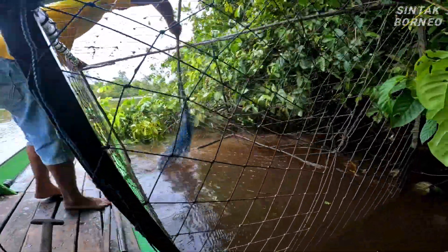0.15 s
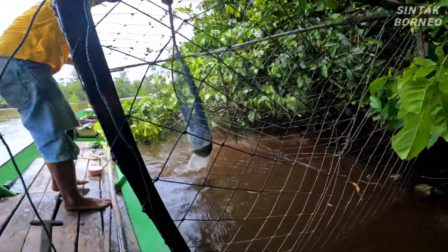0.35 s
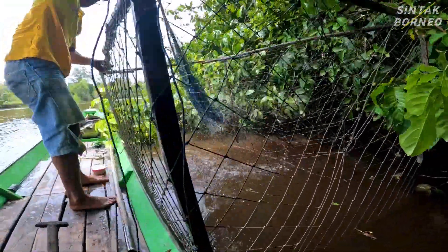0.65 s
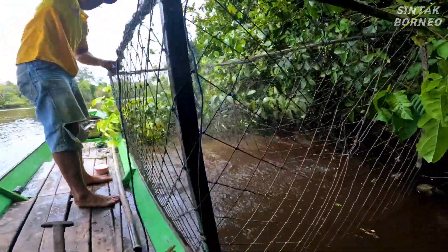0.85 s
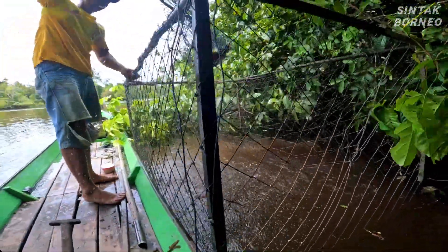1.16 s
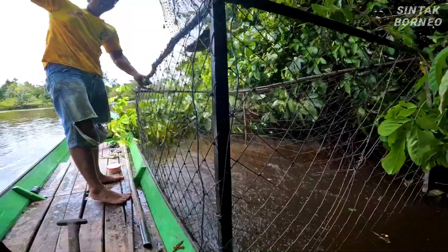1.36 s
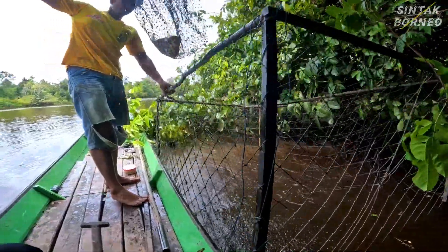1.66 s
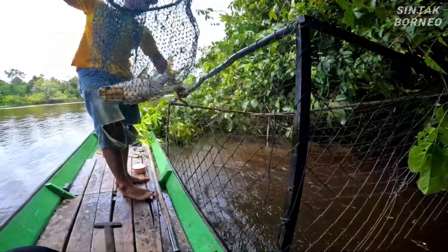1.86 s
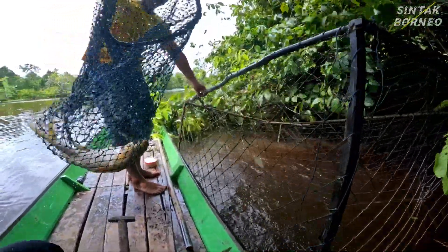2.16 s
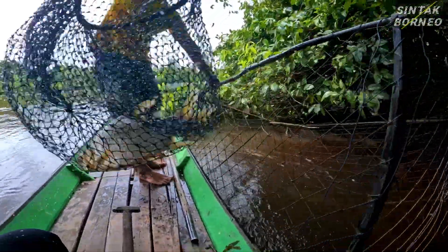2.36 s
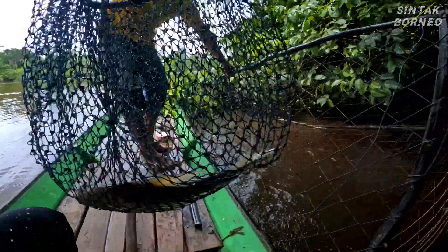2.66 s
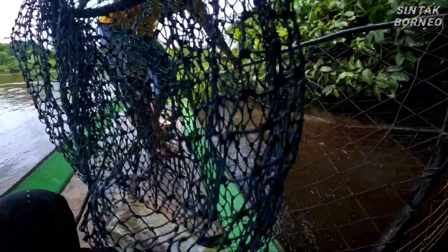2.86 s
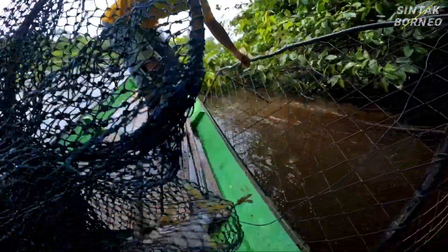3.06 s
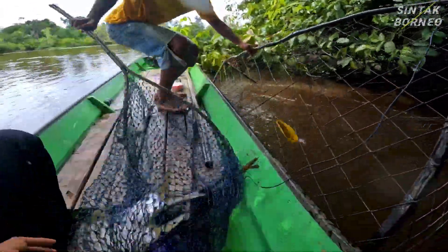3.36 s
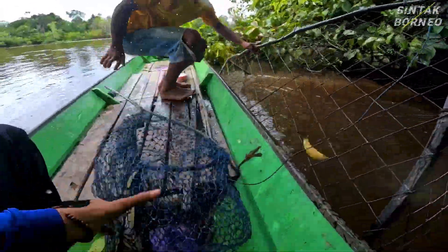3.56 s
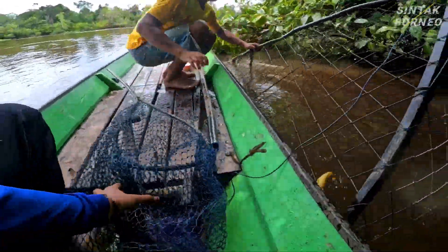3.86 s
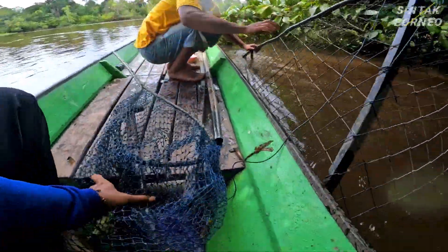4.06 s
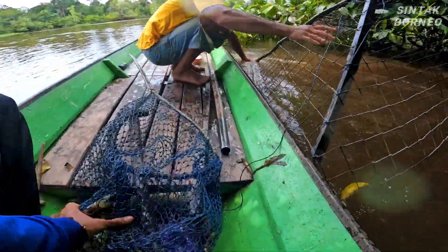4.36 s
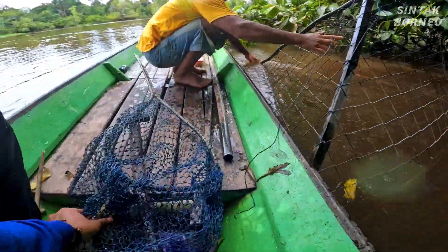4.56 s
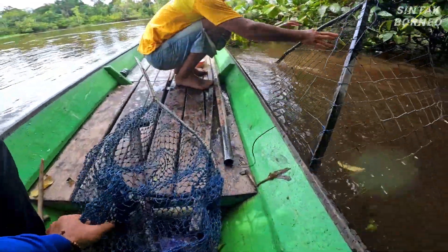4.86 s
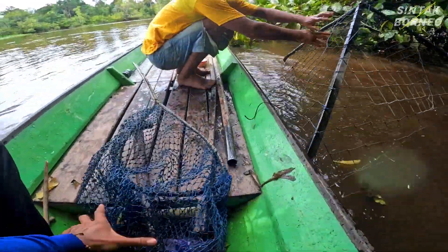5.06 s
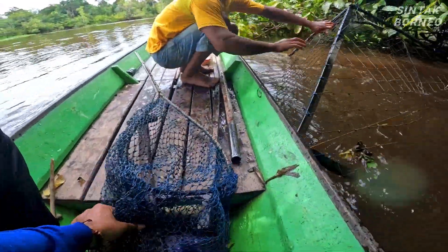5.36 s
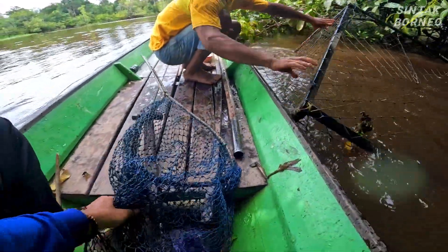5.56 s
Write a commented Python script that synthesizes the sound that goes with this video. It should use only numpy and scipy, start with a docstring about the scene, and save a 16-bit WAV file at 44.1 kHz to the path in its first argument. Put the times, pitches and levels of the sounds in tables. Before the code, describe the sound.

River water splashes, drips and gurgles under buffeting low wind rumble, then a heavy netted fish lands and slaps wetly on wooden boat planks.

```python
"""Water pours and drips, low rumbles swell, then wet slaps and hard knocks ring the planks of a wooden boat.
A large fish is lifted dripping from a river in a net, swung aboard and dropped on the planks.
Water is hiss and short ringing bubbles; wind and later handling bumps are low noise that swells.
Slaps, knocks and rubbing are bursts of noise sent through the resonances of hull, planks and wet skin.
Struck boards, one low thump and lone long-ringing bubbles are single fading tones."""
import sys
import numpy as np
from scipy import signal
from scipy.fft import rfft, irfft, next_fast_len
from scipy.io import wavfile
from scipy.ndimage import uniform_filter1d, map_coordinates

SR = 44100
rng = np.random.default_rng(int(sys.argv[2]) if len(sys.argv) > 2 else 0)


def generate_wav(sig):
    """Save sig (samples, or channels by samples) to the path in sys.argv[1] as 16-bit PCM at SR."""
    pcm = np.round(np.clip(np.atleast_2d(sig).T, -1, 1) * 32767).astype(np.int16)
    wavfile.write(sys.argv[1], SR, pcm)


N = 252252  # length in samples

# Low rumbles: wind gusts at first, then mostly bumps from handling after about 4.1 s.
# Each row: start in seconds, length in seconds, heave level in dB.
LOW_RUMBLES = [(0.108, 0.16, -47.5), (0.432, 0.094, -43), (0.83, 0.11, -47), (0.94, 0.41, -32.5),
               (1.43, 0.062, -19), (1.528, 0.088, -23.5), (1.763, 0.083, -28.5), (2.016, 0.075, -29),
               (2.155, 0.054, -25.5), (2.243, 0.1, -28), (2.406, 0.02, -23.5), (2.69, 0.05, -30),
               (3.035, 0.14, -32.5), (3.24, 0.04, -22.5), (4.168, 0.3, -37), (4.628, 0.02, -26.5),
               (4.74, 0.23, -33), (4.976, 0.24, -28.5), (5.216, 0.021, -27.5), (5.417, 0.12, -29.5),
               (5.55, 0.21, -29)]
# Steady draining and lapping. Each row: time in seconds, fizz level in dB, gurgle level in dB.
WATER_LEVELS = [(0, -46, -85), (.1, -49.5, -73), (.17, -37.5, -42), (.3, -37, -41), (.39, -38.5, -35.5),
                (.5, -39, -45), (.7, -44.5, -75), (.95, -43, -48.5), (1.3, -48, -60), (1.4, -42.5, -51),
                (2.1, -54, -47.5), (2.2, -72, -61), (2.35, -51.5, -48.5), (3.2, -47.5, -60),
                (3.5, -49, -57), (3.62, -58, -69), (3.75, -43.5, -62), (4.06, -50.5, -66),
                (4.47, -51.5, -67), (4.6, -53, -70), (4.65, -57.5, -67), (4.8, -51, -47.5),
                (5.2, -58.5, -62), (5.33, -52.5, -50.5), (5.69, -47, -41.5)]
# Water flung off net and fish. Each row: peak time in seconds, rise in seconds,
# time to fall 60 dB in seconds, level in dB.
WATER_SPLASHES = [(0.031, 0.041, 0.25, -36), (.13, 0.04, 0.19, -43), (0.796, 0.052, 0.36, -40),
                  (1.994, 0.25, 3.1, -43), (2.37, 0.15, 0.15, -38), (3.031, 0.018, 0.3, -33),
                  (3.255, 0.081, .3, -49), (3.326, 0.055, 0.13, -29.5), (3.365, 0.033, 0.23, -24),
                  (3.468, 0.13, 0.21, -35.5), (3.68, 0.03, 0.41, -36), (3.865, 0.034, 0.25, -31),
                  (5.43, 0.25, 0.32, -54), (5.72, 0.023, .3, -23)]
# Tone colour of fizzing water. Each row: frequency in Hz, relative gain in dB.
FIZZ_COLOUR = [(180, 2), (300, 4), (363, -0.5), (469, -0.5), (532, -12), (1340, -3.5), (1620, -4),
               (4640, -4), (7370, -9), (9210, -15), (11900, -12.5), (13500, -21.5)]
# Single drops. Each row: time in seconds, level in dB, bubble pitch in Hz, splat relative to ring in dB.
WATER_DROPS = [(0.0224, -18, 2370, -6), (.022, -24, 1010, -12), (.044, -26.5, 960, -25),
               (0.0447, -19, 5050, -23), (0.1282, -21, 2250, -5), (.1511, -26.5, 2250, -2),
               (.17, -21.5, 2090, -27), (0.2, -29.5, 2250, 3), (0.2266, -26, 5380, -3),
               (0.254, -28, 1790, -2), (0.3144, -15.5, 2120, -17), (.319, -18, 946, -13),
               (0.4108, -19.5, 2440, -25), (0.431, -24, 2120, -20), (.457, -29, 960, -20),
               (0.4775, -23, 4640, -10.5), (.507, -29, 2920, -22), (0.699, -26.5, 1820, -10.5),
               (0.746, -37.5, 3300, 4), (0.79, -28.5, 1930, 5.5), (.8854, -23.5, 4930, -31),
               (0.929, -28, 1330, -5.5), (.955, -37, 2350, -20), (1.155, -23, 5950, -11.5),
               (1.41, -41, 2730, -3), (1.48, -29.5, 1150, -20), (2.028, -38.5, 1350, 4),
               (2.141, -31.5, 2930, -3), (2.2633, -29.5, 5450, -6), (2.6137, -31, 4000, -4),
               (2.636, -29.5, 1320, -4), (2.753, -36, 1300, 1), (4.088, -42, 3200, 5),
               (4.577, -31.5, 1900, -10), (4.595, -33, 2830, -9.5), (5.553, -42, 3080, 8),
               (5.6083, -35, 3450, 1.5)]
# Lone long-ringing bubbles, some gliding in pitch. Each row: time in seconds, level in dB,
# starting pitch in Hz, time to fall 60 dB in seconds,
# glide (half the rise in pitch, in starting pitches per second).
LONG_BUBBLES = [(.355, -29, 450, .13, 6), (1.002, -39, 1254, 0.083, 0), (1.178, -41, 920, 0.1, 7),
                (1.355, -31.5, 775, 0.16, .3)]
# Feet, net and fish rubbing on the planks. Each row: peak time in seconds, rise in seconds,
# time to fall 60 dB in seconds, hull level in dB, plank level in dB.
RUBBING = [(.43, 0.65, 0.38, -37, -46), (3.27, 0.014, 0.85, -21, -29.5), (3.5, 0.41, 0.68, -33.5, -34.5),
           (3.66, 0.041, 2.1, -50, -35.5), (4.345, 0.11, 0.87, -37, -50), (4.46, 0.19, 0.13, -44, -69),
           (4.58, 0.079, 0.22, -43, -46.5), (4.79, 0.19, 0.37, -70, -48), (4.86, 0.031, 1.3, -36.5, -50),
           (4.99, 0.23, 0.57, -34.5, -49.5), (5.385, 0.049, 0.54, -26.5, -30.5),
           (5.445, 0.06, 0.37, -27, -30), (5.499, 0.16, 0.15, -29, -40)]
# Short tones of struck boards, and one low thump at 3.22 s. Each row: time in seconds, level in dB,
# pitch in Hz, time to fall 60 dB in seconds.
BOARD_TONES = [(3.222, -17.5, 65, 0.28), (3.253, -8.5, 2740, 0.019), (3.359, -1.5, 304, 0.039),
               (3.462, -14, 750, 0.034), (3.473, -17, 940, 0.036), (3.549, -19.5, 960, 0.065),
               (3.631, -20.5, 325, 0.086), (3.653, -12.5, 1614, 0.061), (3.709, -16, 1460, 0.023),
               (3.778, -23.5, 336, 0.13), (3.871, -22, 907, 0.11), (3.992, -16, 670, 0.05),
               (4.198, -26, 241, 0.18), (4.196, -33.5, 413, 0.13), (4.948, -21, 87, 0.18),
               (5.086, -19.5, 397, 0.092), (5.086, -26, 672, 0.089), (5.378, -19.5, 930, 0.044),
               (5.481, -17, 695, 0.048), (5.482, -20, 1030, 0.07), (5.5, -16.5, 457, 0.11),
               (5.712, -21, 1430, 0.026)]
# Hard knocks of hoop and pole. Each row: time in seconds, knock level in dB,
# then thud, smack and boom in dB relative to the knock.
HARD_KNOCKS = [(3.023, -33, -5.5, -17, -21), (3.253, -22, -2, 7, -4.5), (3.354, -13.5, -4, -4.5, -19),
               (3.651, -16, -11, -0.5, -38), (3.869, -11, -16.5, -2, -45), (3.991, -21.5, -15.5, -17, -34),
               (4.194, -39.5, 10, -31, 14.5), (4.314, -38.5, -24, -4, -11), (4.575, -46, -4, 3, -20),
               (4.732, -38, 3, -20, 8.5), (4.845, -38, -5, -26, 12.5), (4.947, -31, 3.5, -16, 13),
               (5.084, -29, 5.5, -20, 6.5), (5.376, -18.5, -2, -6, -2.5), (5.479, -27, 0, -35, 7.5),
               (5.656, -33, -17, -4, 0)]
# The fish's wet slaps. Each row: time in seconds, knock level in dB,
# then thud and smack in dB relative to the knock.
WET_SLAPS = [(3.304, -5.5, -4, -1.5), (3.32, -5, -14, 1), (3.358, -1, -37, -9), (3.385, -5, -8, -1),
             (3.446, -16, -10, -7), (3.462, -6, -4.5, -6), (3.489, -13, -3.5, -2), (3.523, -19, 3, -7),
             (3.548, -19, 6, -29), (3.633, -20, -22, -21), (3.681, -11.5, 0, -3), (3.695, -10, -1.5, -2),
             (3.707, -9, -33, -3), (3.757, -9, -8, -3), (3.777, -9.5, -10, -14), (3.854, -14.5, -19, 2),
             (3.904, -9, -7.5, 3), (3.925, -19.5, -1, 6), (4.03, -21.5, -8, -4), (4.097, -27, -6.5, -0.5),
             (4.143, -27.5, -4, 4), (4.395, -29, 6.5, 7), (4.434, -28, -17, -2), (4.518, -32.5, -3, -3),
             (5.422, -20, -1, 11), (5.5, -17.5, 6, -18), (5.713, -21.5, 6, 7.5)]
# Lowest hull resonances. Each row: frequency in Hz, width in Hz, relative gain in dB.
BOOM_MODES = [(112.5, 15.4, 3.5), (178.7, 16.5, 0)]
# Hull resonances. Each row: frequency in Hz, width in Hz, relative gain in dB.
HULL_MODES = [(182.3, 25, 3), (219.7, 18.1, 6), (282, 140, -3.5), (403.7, 36, 2), (460, 170, -7.5),
              (763, 24, -20)]
# Plank resonances. Each row: frequency in Hz, width in Hz, relative gain in dB.
PLANK_MODES = [(596, 116, 3.5), (998, 204, 3.5), (1226, 167, 4.5), (1730, 770, -1.5)]
# Wet skin resonances. Each row: frequency in Hz, width in Hz, relative gain in dB.
SKIN_MODES = [(1870, 280, -0.5), (2430, 560, 2), (3340, 1700, -4.5), (5400, 380, -13)]
# Stereo width. Each row: frequency in Hz, side level before a common lift in dB relative to the middle.
STEREO_WIDTH = [(180, -30), (550, -11.5), (1650, -9), (4970, -7), (15000, -6)]
# Stereo balance. Each row: frequency in Hz, left minus right gain in dB.
STEREO_LEAN = [(60, 1.5), (180, -0.5), (550, -0.5), (1650, 0.0), (4970, 0), (15000, 4)]

ABOARD_S = 3.2  # when the net is aboard
RUMBLE_RISE_DB_PER_S, RUMBLE_FALL_DB_PER_S, LULL_DB = 260, 150, -49
# Flutter has its set level when the heave is at STRONG_DB, and swings wider than the heave.
FLUTTER_DB, FLUTTER_GROWS, STRONG_DB = -26, 1.68, -21.5
CALM_DB = -57  # flutter level soon after the net is aboard
PLINK_DB = -10  # clear bubbles relative to the fizz
RISE_DB = 30  # what a swell climbs in its rise time
# Ring decay is for 1 kHz; the slope is its power law with pitch.
DROP_T60_S, DROP_SLOPE, SPLAT_T60_S = 0.024, -0.3, 0.033
SLAP_T60_S, SLAP_BOOM_DB, KNOCK_T60_S = 0.049, -14.5, 0.092  # boom is relative to the knock
TOP_HZ = 15750  # band limit


def amp(db):
    """Turns a level in dB into a gain."""
    return 10 ** (np.asarray(db) / 20)


def unit(x):
    """Scales a sound to rms 1."""
    return x / np.sqrt(np.mean(x ** 2) + 1e-20)


def along(points, hz):
    """Reads a curve of (Hz, value) points on a log frequency axis."""
    f, v = np.transpose(points)
    return np.interp(np.log(hz + 1), np.log(f + 1), v)


def curves(rows):
    """Gives one value per sample for each column after the time."""
    s, *cols = np.transpose(rows)
    return [np.interp(np.arange(N) / SR, s, c) for c in cols]


def wobble(rate):
    """Draws a smooth random curve with rate random points a second."""
    points = rng.standard_normal(int(N * rate / SR) + 4)
    return map_coordinates(points, [np.arange(N) * rate / SR])


def filtered(x, response):
    """Filters a sound by a response given as a function of frequency."""
    n = x.shape[-1]
    m = next_fast_len(n + SR // 4)
    return irfft(rfft(x, m) * response(np.fft.rfftfreq(m, 1 / SR)), m)[..., :n]


def body(modes):
    """Response of an object that rings at several resonances, added with alternating signs."""
    def response(f):
        total = 0
        for k, (c, w, db) in enumerate(modes):
            total = total + (-1) ** k * amp(db) * 1j * f * w / (c * c - f * f + 1j * f * w)
        return total
    return response


def swells(peak_s, rise_s, t60, db):
    """Summed gain of swells that climb to a peak and die away."""
    t = np.arange(N) / SR - peak_s[:, None]
    shape_db = np.where(t < 0, RISE_DB * t / rise_s[:, None], -60 * t / t60[:, None])
    return np.sqrt(np.sum(amp(2 * (db[:, None] + shape_db)), axis=0))


def steady(x):
    """Evens out the slow level of a noise, so that the rumble levels set it."""
    return x / np.sqrt(np.abs(uniform_filter1d(x ** 2, size=SR // 12)) + 0.037)


def rumble_level():
    """Heave level in dB: each rumble rises, holds and falls back into the lull."""
    start, length, db = np.transpose(LOW_RUMBLES)[:, :, None]
    t = np.arange(N) / SR - start
    rise_db = RUMBLE_RISE_DB_PER_S * np.minimum(t, 0)
    fall_db = RUMBLE_FALL_DB_PER_S * np.maximum(t - length, 0)
    shape_db = db + rise_db - fall_db
    return np.maximum(shape_db.max(axis=0), LULL_DB)


def rumbles():
    """Wind, then mostly handling bumps: a low heave and a quicker flutter, lumpy, stronger on the right."""
    heave_db = rumble_level()
    gusty_db = FLUTTER_DB + FLUTTER_GROWS * (heave_db - STRONG_DB)
    flutter_db = np.where(np.arange(N) < (ABOARD_S + .1) * SR, gusty_db, CALM_DB)
    noise = rng.standard_normal((2, 2, N))
    heave = unit(filtered(noise[0], lambda f: body([(36, 60, 0)])(f) / (1 + (f / 90) ** 4)))
    flutter = unit(filtered(noise[1], lambda f: body([(105, 120, 0)])(f) ** 2 / (1 + (f / 220) ** 6)))
    lumps = amp(6.5 * np.tanh(wobble(18)) - 2)
    shared, own = lumps * (amp(heave_db) * steady(heave) + amp(flutter_db) * steady(flutter))
    return np.array([0.88 * shared + 0.32 * own, 1.31 * shared - 0.54 * own])


def scatter(count):
    """Random places from 0 to 1, and two bell-curve draws for each bubble's pitch and size."""
    return rng.random(count), np.clip(rng.standard_normal((count, 2)), -2.5, 2.5)


def bubbles(start, hz, cycles, size, rise):
    """Damped sines whose pitch climbs as each bubble nears the surface."""
    t = np.arange(SR // 50) / SR
    life = t * (hz / cycles)[:, None]
    wave = size[:, None] * np.exp(-life) * np.sin(2 * np.pi * hz[:, None] * t * (1 + rise * life))
    at = (start * SR).astype(int)[:, None] + np.arange(len(t))
    return np.bincount(at.ravel(), wave.ravel(), N + SR)[:N]


def water(count=6000):
    """A patchy hiss with tiny bursting bubbles, clear plinks, and larger bubbles that gurgle."""
    fizz_db, gurgle_db = curves(WATER_LEVELS)
    splash = swells(*np.transpose(WATER_SPLASHES))

    # Random patches in time and frequency make the hiss uneven.
    z = signal.stft(rng.standard_normal(N), nperseg=256)[2]
    patches = uniform_filter1d(uniform_filter1d(rng.standard_normal(z.shape), 8, 0), 5, 1)
    hiss = signal.istft(z * amp(2.3 * unit(patches)), nperseg=256)[1][:N]

    u, g = scatter(count)
    spray_hz = np.clip(6000 * np.exp(0.618 * g[:, 0]), 600, 15000)
    spray = bubbles(u * N / SR, spray_hz, 4.4, amp(7.3 * g[:, 1]), 0.063)
    spray = filtered(spray, lambda f: f / 4000 + 0.28)
    fizz = unit(filtered(unit(hiss) + .5 * unit(spray), lambda f: amp(along(FIZZ_COLOUR, f))))

    # Once the net is aboard, the fizz is thinner and duller.
    dull = unit(filtered(fizz, lambda f: 1 / (1 + (f / 9000) ** 2) / (1 + (900 / (f + 1)) ** 2)))
    fizz = np.where(np.arange(N) < ABOARD_S * SR, fizz, dull)

    u, g = scatter(count // 2)
    gurgle = bubbles(u * N / SR, 1200 * np.exp(0.406 * g[:, 0]), 6, amp(2.75 * g[:, 1]), 0.02)
    gurgle = unit(filtered(gurgle, lambda f: 1 / (1 + (480 / (f + 1)) ** 4)))

    # Until the net is aboard, drips trap clear bubbles.
    u, g = scatter(count // 8)
    plinks = bubbles(u * ABOARD_S, 2300 * np.exp(.45 * g[:, 0]), 7, amp(2 * g[:, 1]), 0.02)
    fizz = fizz + amp(PLINK_DB) * unit(plinks)

    flicker = amp(1.33 * wobble(80))
    fizz_gain = amp(fizz_db) + splash * amp(3.7 * wobble(55))
    return flicker * (fizz_gain * fizz + amp(gurgle_db) * gurgle)


def drops():
    """Each drop splats on the surface and traps a bubble that rings, longer the larger it is."""
    out, t = np.zeros(N + SR), np.arange(SR // 8) / SR
    for s, db, hz, splat_db in WATER_DROPS:
        ring_t60 = DROP_T60_S * (hz / 1000) ** DROP_SLOPE
        ring = np.sin(2 * np.pi * hz * t * (1 + 0.5 * t)) * amp(-60 * t / ring_t60)
        splat = filtered(rng.standard_normal(len(t)), lambda f: amp(along(FIZZ_COLOUR, f)) * (f > 700))
        splat = unit(splat) * amp(splat_db - 60 * t / SPLAT_T60_S)
        out[round(s * SR):][:len(t)] += amp(db) * (ring + splat) * (1 - np.exp(-t / 0.00048))
    return out[:N]


def long_bubbles():
    """A lone bubble rings long without a splat; some glide in pitch as they move."""
    out, t = np.zeros(N + SR), np.arange(SR // 8) / SR
    for s, db, hz, t60, glide in LONG_BUBBLES:
        ring = np.sin(2 * np.pi * hz * t * (1 + glide * t))
        out[round(s * SR):][:len(t)] += amp(db - 60 * t / t60) * ring * (1 - np.exp(-t / 0.0018))
    return out[:N]


def drag():
    """Uneven rubbing keeps hull and planks sounding."""
    *shape, hull_db, plank_db = np.transpose(RUBBING)
    uneven = amp(4 * wobble(40))
    rub = uneven * rng.standard_normal((2, N))
    hull = unit(filtered(rub[0], lambda f: body(HULL_MODES)(f) ** 2 / (1 + (f / 900) ** 4)))
    plank = unit(filtered(rub[1], lambda f: body(PLANK_MODES)(f) / (1 + (f / 3500) ** 2)))
    return swells(*shape, hull_db) * hull + swells(*shape, plank_db) * plank


def board_tones():
    """Struck boards, and one low thump, ring briefly at their own pitches, which waver a little."""
    out, t = np.zeros(N + SR), np.arange(SR // 8) / SR
    for s, db, hz, t60 in BOARD_TONES:
        waver = uniform_filter1d(rng.standard_normal(len(t)), size=220) * np.sqrt(220)
        ring = np.sin(2 * np.pi * hz * t + 0.13 * waver)
        out[round(s * SR):][:len(t)] += amp(db - 60 * t / t60) * ring * (1 - np.exp(-t / 0.0011))
    return out[:N]


def blows(table, t60, rise_s, crack_size):
    """A crack and a ragged burst drive planks and wet skin; a push drives the hull."""
    out, t = np.zeros((4, N + SR)), np.arange(SR // 4) / SR
    crack = crack_size * np.exp(-t / .00007)
    shove = crack_size * 0.49 * np.exp(-t / 0.0015)
    rise = 1 - np.exp(-t / rise_s)
    for s, db, thud_db, smack_db, boom_db in table:
        noise = rise * rng.standard_normal((4, len(t)))
        # The contact breaks into small slips.
        ragged = amp(5 * uniform_filter1d(noise[0], 110) * np.sqrt(110) - 3)
        knock = crack + noise[1] * ragged * amp(-60 * t / t60)
        smack = crack + noise[2] * ragged * amp(-60 * t / (0.36 * t60))
        push = shove + noise[3] * amp(-60 * t / (1.67 * t60))
        parts = np.array([knock, amp(smack_db) * smack, amp(thud_db) * push, amp(boom_db) * push])
        out[:, round(s * SR):][:, :len(t)] += amp(db) * parts
    return out[:, :N]


def slaps():
    """Hard knocks start quickly, wet slaps swell in; both ring the boat, whose heavy parts dull the treble."""
    drive = blows(HARD_KNOCKS, KNOCK_T60_S, rise_s=0.00046, crack_size=3.5)
    slap_rows = [(*row, SLAP_BOOM_DB) for row in WET_SLAPS]
    drive = drive + blows(slap_rows, SLAP_T60_S, rise_s=0.0039, crack_size=0.58)
    # Each row: resonances, gain in dB, treble roll-off in Hz.
    parts = [(PLANK_MODES, 7, 2600), (SKIN_MODES, 12, 9000), (HULL_MODES, 15, 1200), (BOOM_MODES, 18, 500)]
    out = np.zeros(N)
    for x, (modes, db, top_hz) in zip(drive, parts):
        out += amp(db) * filtered(x, lambda f: body(modes)(f) / (1 + 1j * f / top_hz) ** 2)
    return out


def spread(x):
    """Makes stereo for two close microphone openings, whose difference is a copy with shifting phases."""
    z = signal.stft(x, nperseg=256)[2]
    side = signal.istft(z * np.exp(2j * np.pi * rng.random(z.shape)), nperseg=256)[1][:N]
    side = filtered(side, lambda f: amp(along(STEREO_WIDTH, f) + 1.5))
    left_right = np.array([x + side, x - side])
    return filtered(left_right, lambda f: amp(along(STEREO_LEAN, f) * np.array([[.5], [-.5]])))


def scene():
    """Spreads boat and water in stereo and adds the low rumbles."""
    return spread(water() + drops() + long_bubbles() + slaps() + board_tones() + drag()) + rumbles()


def record(dry):
    """The treble falls away steeply around 14 kHz; nothing is kept above the band limit."""
    return filtered(dry, lambda f: (f < TOP_HZ) / (1 + (f / 14200) ** 24))


dry = scene()
out = record(dry)
generate_wav(out)
```